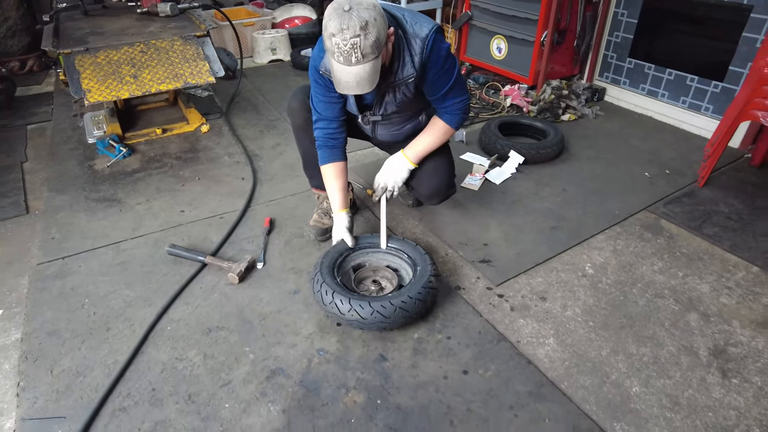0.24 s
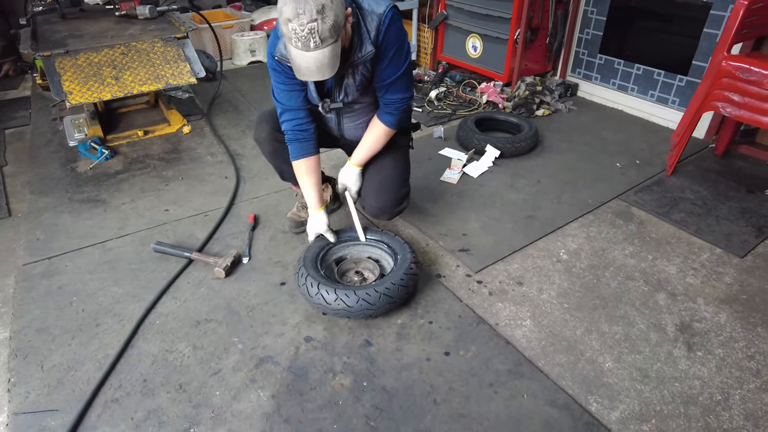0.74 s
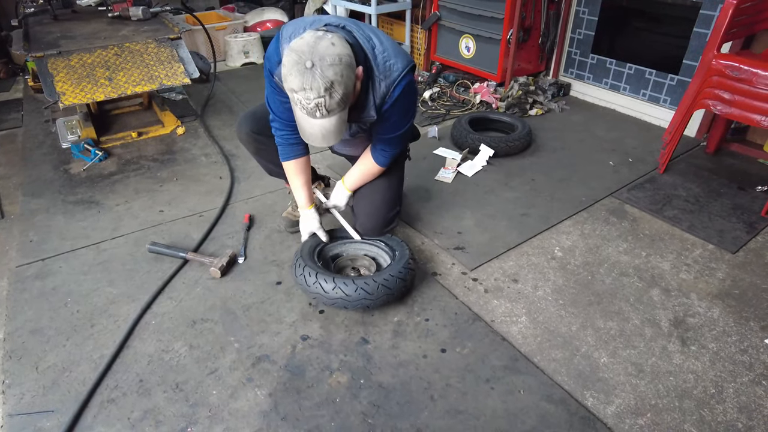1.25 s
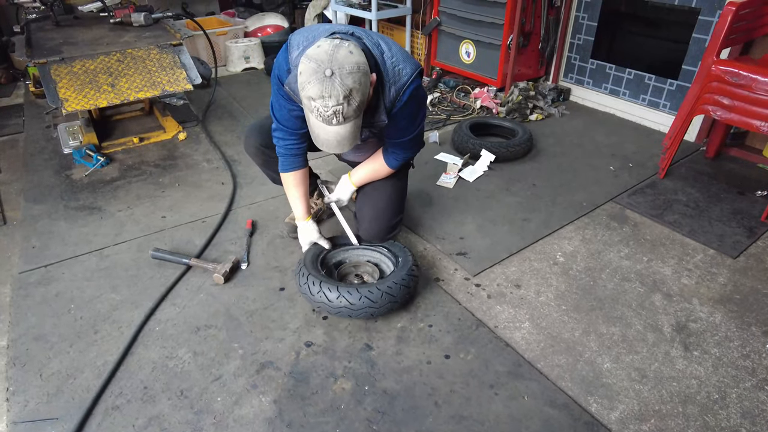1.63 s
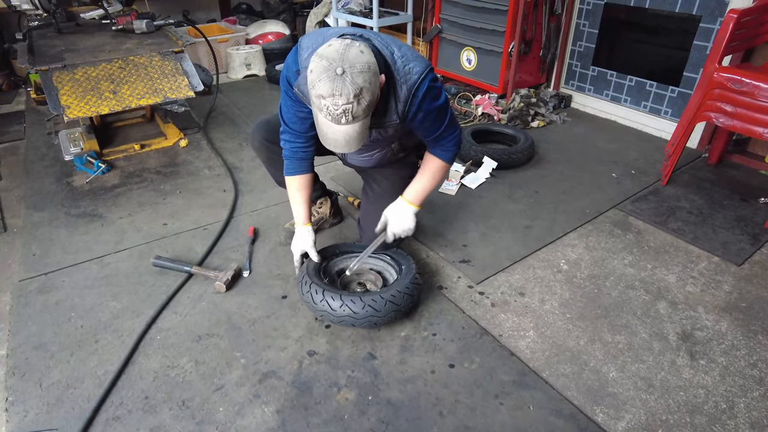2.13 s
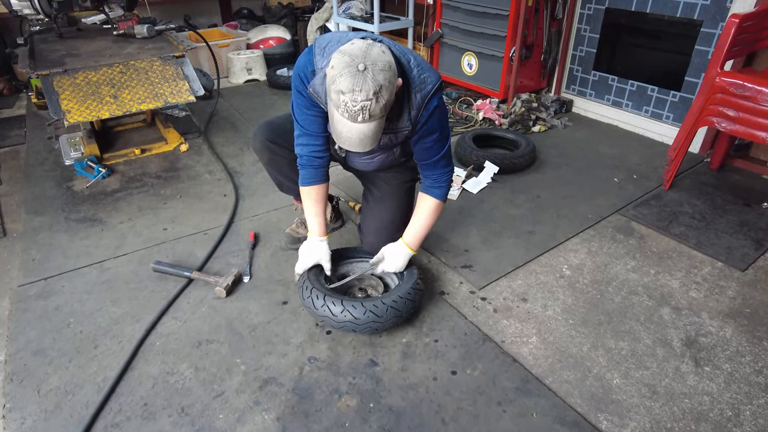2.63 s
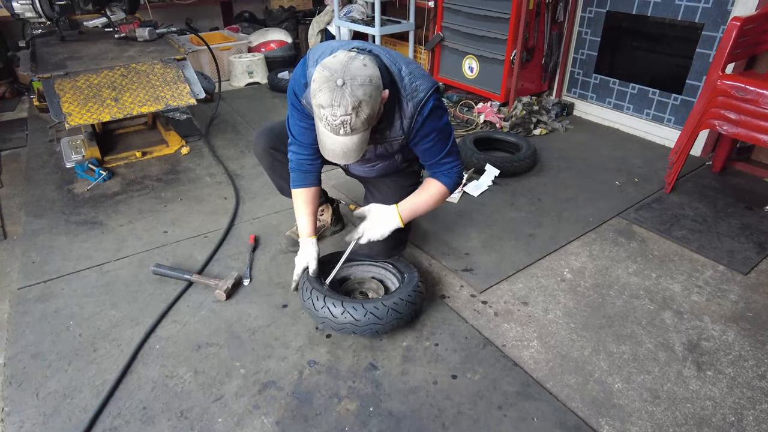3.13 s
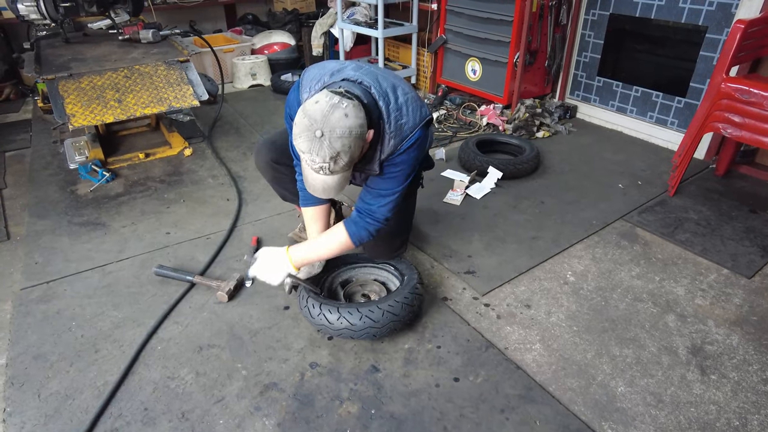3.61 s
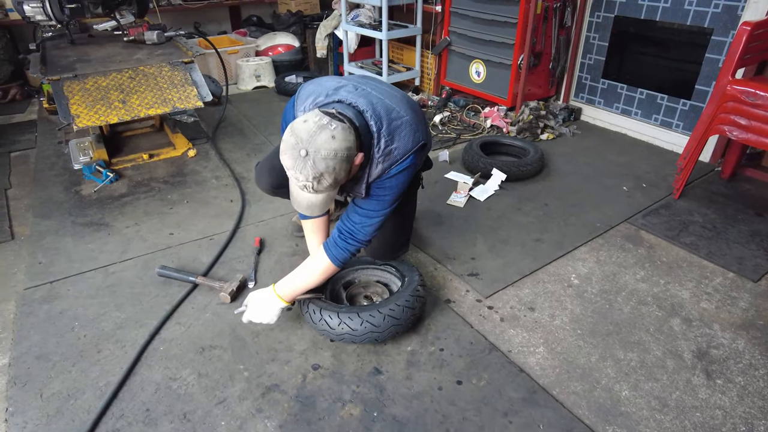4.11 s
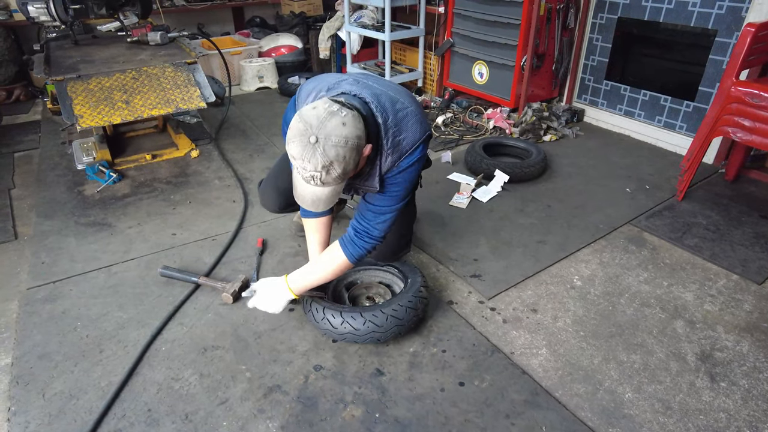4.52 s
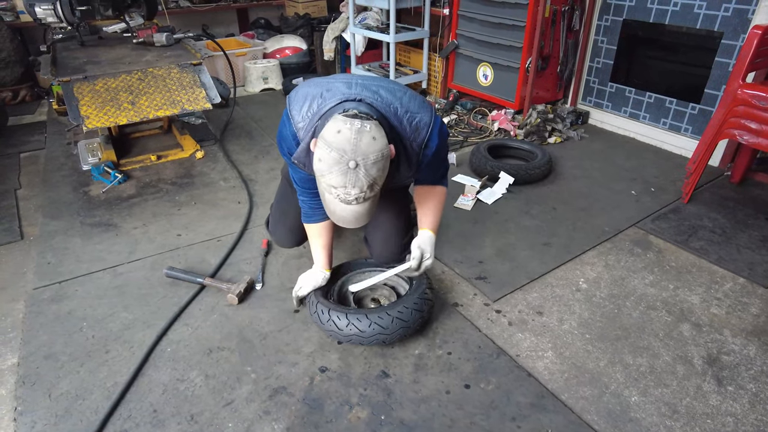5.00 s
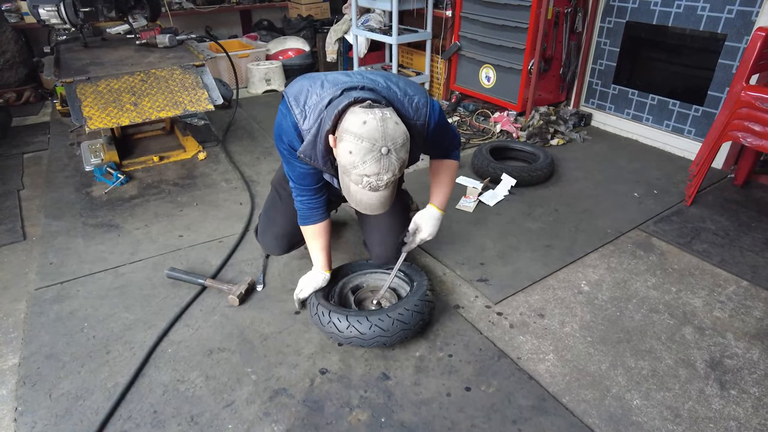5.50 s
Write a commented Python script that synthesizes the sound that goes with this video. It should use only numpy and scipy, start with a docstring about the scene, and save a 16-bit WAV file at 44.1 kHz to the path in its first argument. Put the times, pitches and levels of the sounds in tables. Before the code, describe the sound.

Metal tire levers knock and scrape on a wheel rim amid dull rubber thumps, then two levers clash with a bright ring in a workshop.

```python
"""Soft hiss and a dull rubber thump come first: a scooter tire is pried off its rim on a workshop floor.
The rubber thumps are short swinging tones, and filtered noise makes the moving cloth, rubbing and air.
Steel levers knock on the rim as gritty noise plus ringing tones; small ticks and scrapes lie between.
Near the end two levers clash and ring in beating pairs of tones. The room adds echo and a low boom."""
import sys
import numpy as np
from scipy import signal
from scipy.fft import rfft, irfft
from scipy.io import wavfile

SR = 44100
rng = np.random.default_rng(int(sys.argv[2]) if len(sys.argv) > 2 else 0)


def pcm_store(signal):
    """Save signal as 16-bit PCM."""
    levels = np.round(np.clip(np.atleast_2d(signal), -1, 1) * 32767)
    wavfile.write(sys.argv[1], SR, levels.astype(np.int16).T)


N = 253575
TIME = np.arange(N) / SR  # the whole scene, in seconds
AFTER = TIME[:SR * 3 // 4]  # seconds since the start of one short sound

# the loose levers are struck; a low cutoff dulls the blow, damping is by hand and rim:
# (start_s, long_lever_db, short_lever_db, contact_cutoff_hz, damping_t60_s)
CLASHES = [(5.1425, -1.5, -1, 19000, 20), (5.4065, 0, -22, 5200, .6)]


def from_db(db):
    """Turn decibels into a gain."""
    return 10 ** (np.asarray(db) / 20)


def rms(x):
    """Average strength of a sound (root mean square)."""
    return np.sqrt(np.mean(x ** 2) + 1e-20)


def fade(t60):
    """Exponential decay that loses 60 dB in t60 seconds."""
    return np.exp(-np.log(1000) * AFTER / t60)


def cut(x, hz, kind, order=2):
    """Butterworth filter that keeps the low part ("low") or a band ("band")."""
    edges_hz = np.clip(hz, 5, .48 * SR)
    sections = signal.butter(order, edges_hz, kind, fs=SR, output="sos")
    return signal.sosfilt(sections, x)


def add(track, s, sound):
    """Mix a sound into the track from time s (seconds) on."""
    start = max(round(s * SR), 0)
    track[start:start + len(sound)] += sound[:N - start]


def noise(spectrum, size):
    """Noise coloured by a table of pitches and levels, scaled to rms 1."""
    hz, db = np.transpose(spectrum)
    bins_hz = np.maximum(np.fft.rfftfreq(size, 1 / SR), 1)
    colour_db = np.interp(np.log(bins_hz), np.log(hz), db)
    white = rng.standard_normal(size)
    coloured = irfft(rfft(white) * from_db(colour_db), size)
    return coloured / rms(coloured)


def mode(hz, db, t60):
    """One resonance: a sine tone that dies away."""
    return from_db(db) * fade(t60) * np.sin(2 * np.pi * hz * AFTER)


def movement(hiss_db=3, flutter_db=3.0, flutter_hz=25):
    """Every move swells and fades as a bright swish of cloth and an uneven low rub, over the still room."""
    # arm moves swish the jacket and rub the tire; swish levels are before hiss_db:
    # (middle_s, half_length_s, swish_db, low_rub_db)
    moves = [(0.054, 0.21, -65, -63), (0.244, 0.033, -63, -80), (0.63, 0.17, -60.5, -54),
             (.98, 0.14, -62, -53), (1.173, .06, -67.5, -58.5), (1.402, 0.16, -65, -59),
             (1.682, 0.18, -63, -53), (1.955, 0.09, -61.5, -64), (2.212, 0.27, -64.5, -59),
             (2.54, 0.18, -62, -61), (3.074, 0.16, -68.5, -54.5), (3.6, 0.23, -63, -52.5),
             (3.97, 0.2, -61.5, -51.5), (4.334, 0.14, -63, -53), (4.767, 0.21, -63, -58),
             (5.04, 0.13, -65, -57.5), (5.52, .2, -68.5, -62)]
    # colour of the swish of cloth: (pitch_hz, relative_level_db)
    hiss_colour = [(530, -5.5), (900, 2), (1070, -8.5), (1460, -5.5), (1660, -3), (1880, -4.5), (2730, -2),
                   (3040, -4), (4410, -7.5), (6480, -7), (10900, -19), (12600, -22.5), (16000, -30)]
    # colour of the low rub: (pitch_hz, relative_level_db)
    rub_colour = [(41, -4), (70, -1.5), (120, -1.5), (150, -6.5), (281, 0), (459, -3), (597, -4),
                  (685, -13), (926, -11.5), (1400, -20.5), (1820, -74.5), (3080, -120)]
    # between the moves: steady hiss (before hiss_db) and low murmur
    still_hiss_db, still_murmur_db = -70.5, -63.5

    swish, rub = from_db(still_hiss_db), from_db(still_murmur_db)
    for middle_s, half_s, swish_db, rub_db in moves:
        speed = np.exp(-((TIME - middle_s) / half_s) ** 2)
        swish = np.hypot(swish, from_db(swish_db) * speed)
        rub = np.hypot(rub, from_db(rub_db) * speed)
    flutter = cut(rng.standard_normal(N), flutter_hz, "low")
    unevenness = from_db(flutter_db * flutter / rms(flutter))
    bright = from_db(hiss_db) * swish * noise(hiss_colour, N)
    low = unevenness * rub * noise(rub_colour, N)
    return bright + low


def draught(air_db=1, rise_s=0.033, fall_s=0.17, still_air_db=-54.5):
    """Air drifts over the microphone as very low noise; each puff rises quickly and settles slowly."""
    # puffs reach the microphone, levels before air_db: (peak_s, level_db)
    puffs = [(.55, -48), (.88, -51), (1.54, -44), (3.24, -46.5), (3.55, -48), (3.87, -41), (4.12, -31.5)]
    # colour of the moving air: (pitch_hz, relative_level_db)
    air_colour = [(4, -22), (12, 2), (25, -12), (50, -21), (100, -30), (300, -73.5)]

    flow = from_db(still_air_db)
    for peak_s, db in puffs:
        distance = np.maximum((peak_s - TIME) / rise_s, (TIME - peak_s) / fall_s)
        flow = np.hypot(flow, from_db(db) * np.exp(-distance))
    return from_db(air_db) * flow * noise(air_colour, N)


def tire_thumps(bounce_hz=100, bounce_t60=0.056):
    """The rubber swings for a few cycles and damps itself; the whole tire bounces lower down."""
    # the rubber gives way: (start_s, level_db, pitch_hz, swell_s, bounce_db)
    thumps = [(.006, -32, 320, 0.0065, -39), (0.146, -44, 328, 0.0055, -41.5),
              (0.209, -44.5, 253, 0.0058, -49), (.408, -41.5, 330, 0.0067, -49),
              (0.519, -34.5, 318, 0.0043, -61), (.536, -26.5, 280, 0.0061, -41.5),
              (1.099, -42.5, 342, 0.0032, -57), (1.281, -32, 339, 0.0044, -61),
              (1.509, -22.5, 310, 0.0074, -60), (2.496, -28.5, 292, 0.0053, -36.5),
              (2.741, -30.5, 280, 0.01, -52), (3.228, -23.5, 304, 0.0055, -32.5),
              (3.673, -36.5, 277, 0.006, -68), (3.8439, -2, 321, 0.0038, -21.5),
              (4.118, -30, 307, 0.0062, -30.5), (5.405, -26.5, 367, 0.0049, -42),
              (5.428, -25, 388, 0.0029, -49)]

    out = np.zeros(N)
    for s, db, hz, swell_s, bounce_db in thumps:
        envelope = (AFTER / swell_s * np.exp(1 - AFTER / swell_s)) ** 4  # strongest at swell_s
        swing = np.sin(2 * np.pi * hz * (AFTER - swell_s))
        add(out, s, from_db(db) * envelope * swing)
        soft_start = 1 - np.exp(-AFTER / swell_s)
        add(out, s, mode(bounce_hz, bounce_db, bounce_t60) * soft_start)
    return out


def workshop(x, wet_db=-9, build_s=0.0021, room_t60_s=0.39):
    """Many mixed reflections, made from decaying noise, build up and die away."""
    # colour of the room's echo: (pitch_hz, relative_level_db)
    echo_colour = [(100, 8.5), (300, -3.5), (500, -4.5), (800, -3.5), (2500, -6.5), (7000, -7.5),
                   (10000, -7.5), (16000, 1.5)]

    build_up = 1 - np.exp(-(AFTER / build_s) ** 2)
    echo = noise(echo_colour, len(AFTER)) * fade(room_t60_s) * build_up
    echo = echo / np.sqrt(np.sum(echo ** 2))
    return from_db(wet_db) * signal.fftconvolve(x, echo)[:N]


def boom(x, level_db=-40, delay_s=0.01878):
    """Thumps come back from the walls and set the room's low resonances going."""
    # low resonances of the workshop: (pitch_hz, relative_level_db, t60_s)
    resonances = [(118.8, -17.5, .4), (174, -11, 0.37), (209.7, -13.5, 0.17), (270.5, -23.5, 0.16),
                  (302.4, -28, 0.23), (332, -25, 0.33), (382, -22.5, 0.25), (477, -4.5, 0.18)]

    out = np.zeros(N)
    response = sum(mode(*row) for row in resonances)
    add(out, delay_s, from_db(level_db) * signal.fftconvolve(x, response)[:N])
    return out


def ticks(t60=0.016, spread=1.08):
    """Tiny snaps of grit and rubber, too light to make the rim ring: narrow bursts of noise."""
    # small dry ticks: (start_s, peak_db, pitch_hz)
    snaps = [(0.334, -41, 3460), (0.375, -48.5, 3120), (0.4072, -48.5, 3250), (0.439, -49, 3100),
             (1.143, -51, 3180), (1.362, -46.5, 3550), (2.193, -44.5, 3580), (3.119, -47, 3360),
             (3.392, -54, 3450), (3.499, -45.5, 3580), (3.608, -40, 4460), (4.483, -46, 3200),
             (5.007, -42, 1460)]

    out = np.zeros(N)
    for s, db, hz in snaps:
        burst = rng.standard_normal(len(AFTER)) * fade(t60)
        snap = cut(burst, [hz / spread, hz * spread], "band", order=1)
        add(out, s, from_db(db) * snap / np.abs(snap).max())
    return out


def rim_knocks(crack_db=10, crack_t60=0.04, press_s=0.000057, favour_db=6, favour_octaves=0.16, top_hz=9000):
    """A gritty crack plus the rim's modes; the contact point weights four registers and favours a pitch."""
    # lever on rim, with levels for four registers and how freely the rim rings:
    # (start_s, low_db, middle_db, bright_db, top_db, favoured_pitch_hz, ring_db)
    knocks = [(.519, -54.5, -77, -78, -72, 740, -23), (.539, -45, -62, -67, -75, 900, -16),
              (1.283, -55, -64, -62, -79, 770, -6), (1.305, -59.5, -52, -54.5, -74, 770, -5.5),
              (1.511, -44, -46, -42.5, -55, 2750, -7), (1.7212, -49, -49.5, -41.5, -69, 3100, -11.5),
              (1.747, -72, -56, -56, -63, 1750, 4), (2.425, -47.5, -46.5, -41.5, -57.5, 3180, -3),
              (2.7415, -35, -32.5, -33.5, -47, 760, -9.5), (2.8365, -45, -40.5, -34.5, -53, 2790, -7.5),
              (2.935, -58, -60, -58.5, -80, 4300, -6), (3.044, -49, -56, -51.5, -72, 3000, -15.5),
              (3.226, -38, -49, -56, -82, 930, -17), (3.673, -45.5, -53, -64, -70, 700, -19.5),
              (3.845, -39.5, -43, -65, -60.5, 900, -14), (4.118, -44, -53.5, -57.5, -66, 900, -26),
              (4.843, -56, -46.5, -46.5, -66, 1940, -15), (4.857, -53, -51, -49.5, -58, 5000, -5),
              (5.4055, -34, -33.5, -27.5, -40.5, 4120, -23), (5.428, -44, -36.5, -36.5, -64, 3100, -15),
              (5.449, -47, -52, -42, -55, 477, -34)]
    # modes of the rim, damped by the tire: (pitch_hz, relative_level_db, t60_s)
    rim_modes = [(472, -9, .2), (540, -10, .12), (606, -14, .15), (770, -3, .3), (900, -6, .06),
                 (1464, -13, .12), (1680, -8, .2), (1864, -6, .18), (2083, -7, .13), (2420, -11, .14),
                 (2857, -7, .12), (3070, -4, .17), (3147, -8, .13), (3455, -7, .16), (4100, -9, .16),
                 (4201, -7, .16), (4366, -6, .22), (4987, -12, .16), (5453, -10, .15), (6570, -8, .16),
                 (11110, -12, .12)]
    # colour of a lever's crack on the rim: (pitch_hz, relative_level_db)
    crack_colour = [(400, 10.5), (900, 8.5), (1250, -2.5), (1900, 11), (2450, -4.5), (3100, 7.5), (4200, 0),
                    (5000, -4), (6600, -3), (8500, -5), (16000, -9)]
    registers_hz = [(450, 1200), (1200, 2600), (2600, 6000), (6000, 15000)]

    out = np.zeros(N)
    for s, *levels_db, favoured_hz, ring_db in knocks:
        blow = from_db(crack_db) * noise(crack_colour, len(AFTER)) * fade(crack_t60)
        for hz, db, t60 in rim_modes:
            nearness = np.exp(-(np.log2(hz / favoured_hz) / favour_octaves) ** 2)
            strength = rng.choice([-1, 1]) * from_db(2 * rng.normal())  # no two blows land alike
            blow += strength * mode(hz, db + ring_db + favour_db * nearness, t60)
        pressed = blow * (1 - np.exp(-AFTER / press_s))
        blow = cut(pressed, top_hz, "low", order=4)
        for edges_hz, db in zip(registers_hz, levels_db):
            part = cut(blow, edges_hz, "band", order=3)
            # the level is set by the first 20 ms
            add(out, s, from_db(db) * part / rms(part[:SR // 50]))
    return out


def scrapes(grit_db=4, slip_hz=250):
    """Steel and gloves slide over rubber: short strokes of noise, roughened by quick stick and slip."""
    # strokes of friction: (strongest_s, level_db, half_length_s, pitch_hz)
    strokes = [(1.513, -43, 0.0069, 4060), (1.698, -63, 0.014, 4230), (1.717, -48.5, 0.01, 2950),
               (1.744, -53, 0.011, 2480), (3.5, -63.5, 0.024, 5000), (3.846, -54, 0.044, 1574),
               (3.887, -48, 0.047, 1900), (4.115, -55, 0.0089, 4630), (4.19, -53, 0.02, 3560),
               (4.304, -59.5, 0.028, 3820)]

    out = np.zeros(N)
    middle_s = AFTER.mean()
    for s, db, half_s, hz in strokes:
        slips = cut(rng.standard_normal(len(AFTER)), slip_hz, "low")
        roughness = from_db(grit_db * slips / rms(slips))
        rub = cut(rng.standard_normal(len(AFTER)) * roughness, [hz / 2, hz * 2], "band")
        stroke = np.exp(-((AFTER - middle_s) / half_s) ** 2)
        add(out, s - middle_s, from_db(db) * rub / rms(rub) * stroke)
    return out


def lever_crack(level_db=-12, t60=0.057, attack_s=0.0029):
    """Steel buzzes on steel for a moment as the two levers meet: a short burst of noise."""
    # colour of the steel's crack: (pitch_hz, relative_level_db)
    crack_colour = [(300, -13.5), (600, -3), (1200, -17), (2700, 0), (3500, -9.5), (4600, 2), (5400, -7.5),
                    (7200, 4.5), (8600, -8), (12000, -16), (16000, -41.5)]

    out = np.zeros(N)
    attack = 1 - np.exp(-AFTER / attack_s)
    buzz = noise(crack_colour, len(AFTER)) * fade(t60) * attack
    add(out, CLASHES[0][0] - .001, from_db(level_db) * buzz)  # just ahead of the first ring
    return out


def lever_rings(return_s=0.034, build_s=0.029, attack_s=0.0009, twin_db=-7):
    """Free steel bars ring in beating pairs of tones, which swell again as the walls send them back."""
    # pitches of each lever's bending modes, lowest first: pitch_hz
    long_hz = [328, 1325, 3482, 4234, 4987, 5849, 7660, 9029, 13560]
    short_hz = [1755, 2872, 6268, 9747, 11998, 14382, 15230]
    # the same modes, t60 before damping, and the share that swells back from the room:
    # (relative_level_db, t60_s, returned_share as a ratio, beat_with_twin_hz)
    long_lever = [(-43, 0.52, 0.087, 1), (-48.5, 0.43, 0.77, 4), (-45.5, 0.37, 1.1, 20),
                  (-32.5, 0.36, 1.3, 8.2), (-35.5, 0.26, .1, 4), (-22, 0.26, 0.086, 12),
                  (-33.5, 0.28, 4.9, 31), (-45.5, 0.66, 0.35, 4.3), (-59, .45, .4, 12)]
    short_lever = [(-26, .2, 0.86, 2.4), (-19.5, 0.21, 4.5, 2), (-29, 0.32, 1.7, 5.1),
                   (-17.5, 0.23, 0.09, 19), (-21.5, 0.21, .1, 25), (-38, .22, 1.5, 30), (-58.5, .3, .5, 10)]

    out = np.zeros(N)
    returned = .5 + .5 * np.tanh((AFTER - return_s) / build_s)
    attack = 1 - np.exp(-AFTER / attack_s)
    for s, long_db, short_db, contact_hz, damping_t60 in CLASHES:
        ring = 0
        levers = ((long_hz, long_lever, long_db), (short_hz, short_lever, short_db))
        for pitches_hz, bar, blow_db in levers:
            for hz, (db, t60, share, beat_hz) in zip(pitches_hz, bar):
                pair = mode(hz, db, t60) + mode(hz + beat_hz, db + twin_db, t60)
                strength = from_db(blow_db) * rng.choice([-1, 1])
                ring = ring + strength * pair * (1 + share * returned)
        damped = ring * fade(damping_t60) * attack
        add(out, s, cut(damped, contact_hz, "low"))
    return out


def scene():
    """Blows and scrapes with their room, the lever rings, ticks, the worker's movement and the air."""
    thumps = tire_thumps()
    blows = rim_knocks() + lever_crack() + thumps + scrapes()
    room = workshop(blows) + boom(thumps)
    mix = blows + room + lever_rings() + ticks() + movement() + draught()
    return mix[None]  # one channel


def record(dry, cutoff_hz=15800):
    """A steep low-pass filter removes the very top of the treble."""
    return signal.sosfilt(signal.ellip(10, .1, 90, cutoff_hz, fs=SR, output="sos"), dry)


dry = scene()
out = record(dry)
pcm_store(out)
```